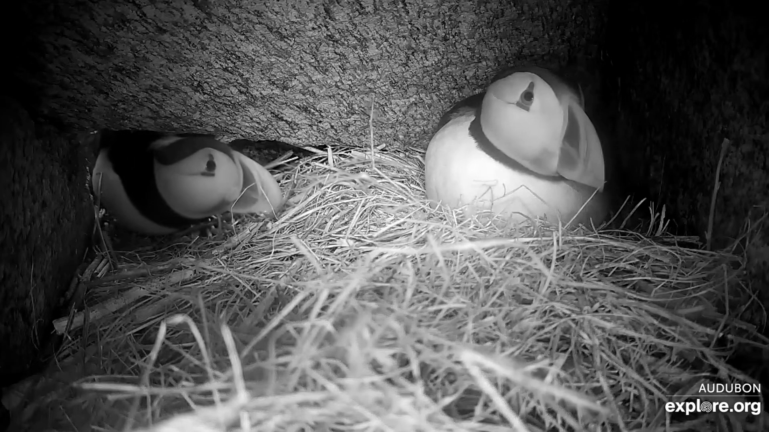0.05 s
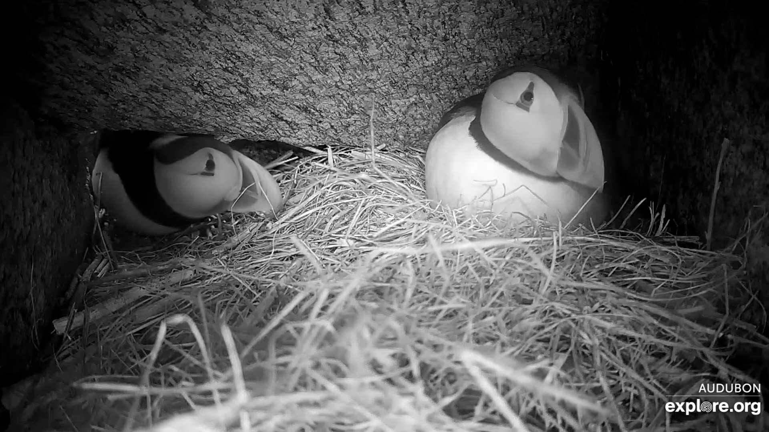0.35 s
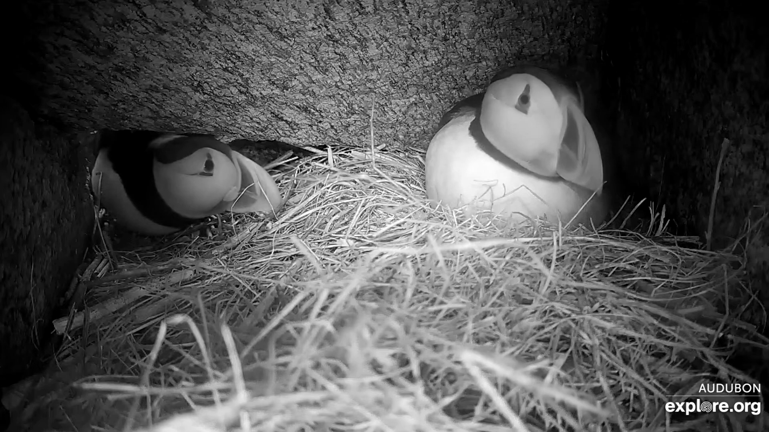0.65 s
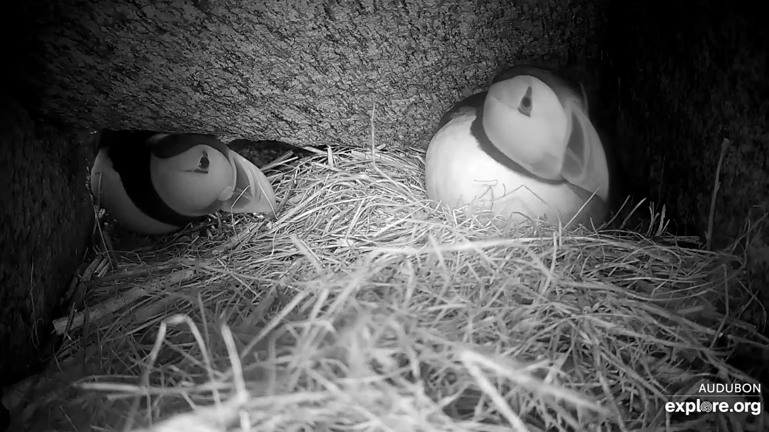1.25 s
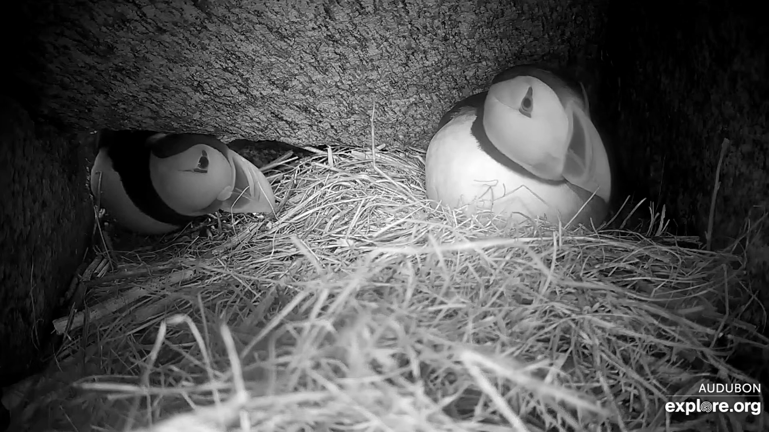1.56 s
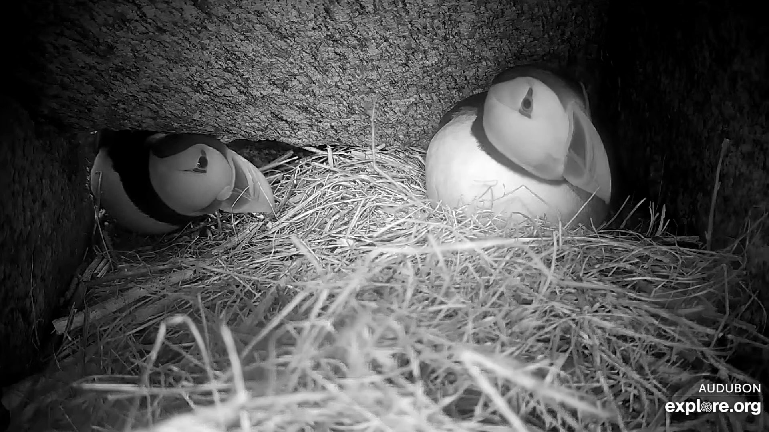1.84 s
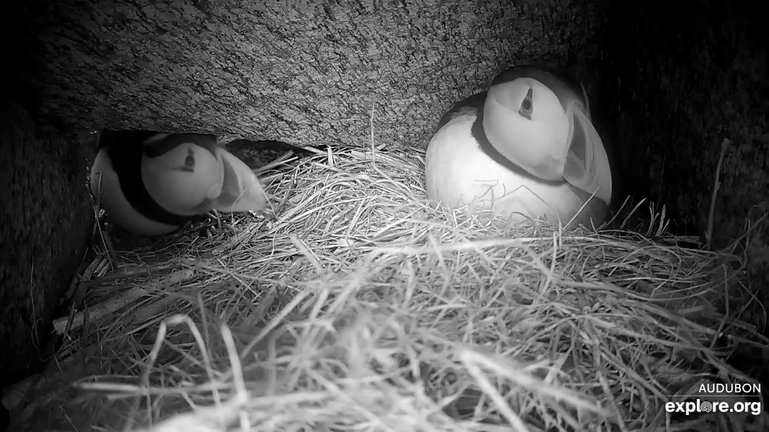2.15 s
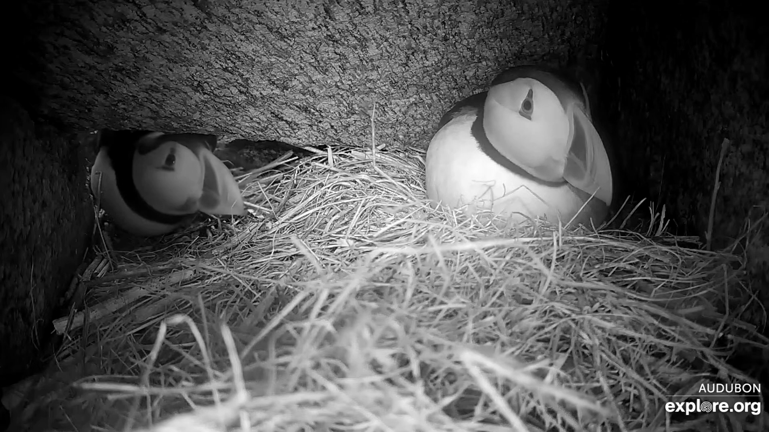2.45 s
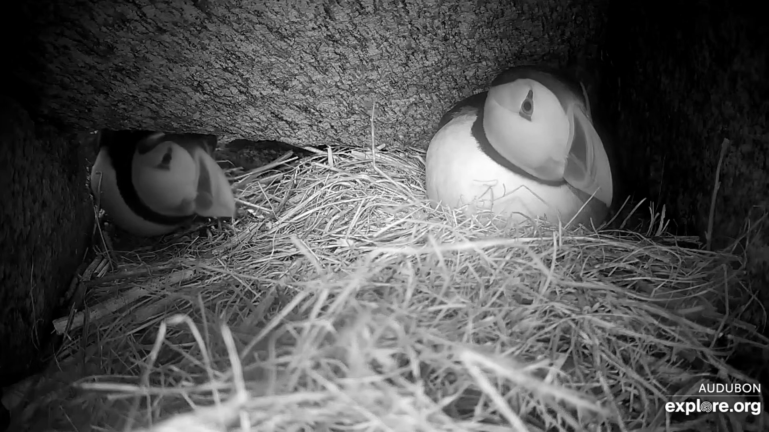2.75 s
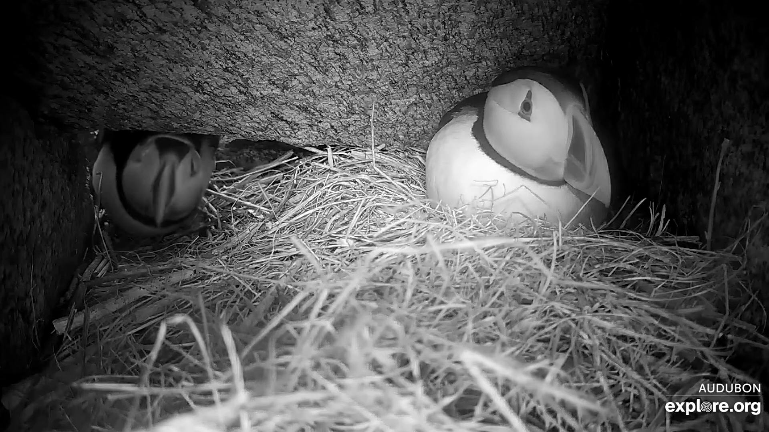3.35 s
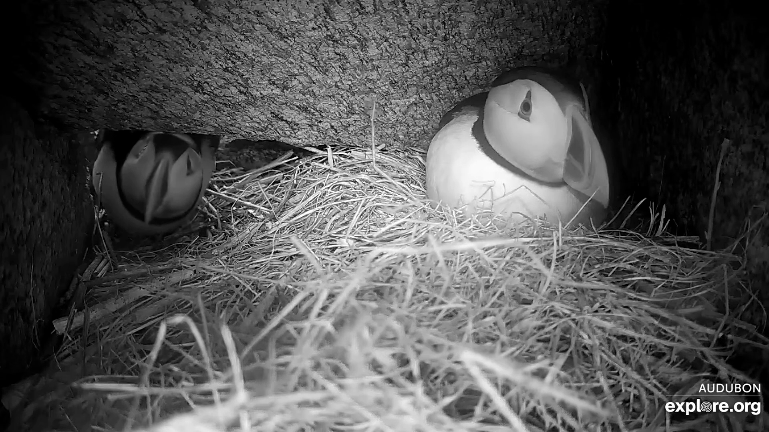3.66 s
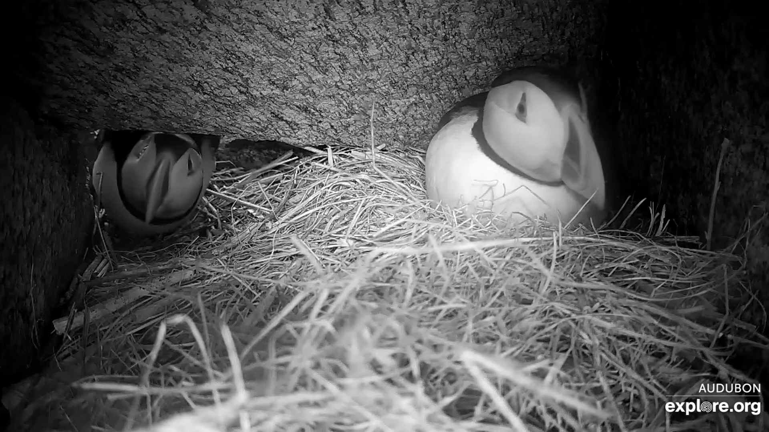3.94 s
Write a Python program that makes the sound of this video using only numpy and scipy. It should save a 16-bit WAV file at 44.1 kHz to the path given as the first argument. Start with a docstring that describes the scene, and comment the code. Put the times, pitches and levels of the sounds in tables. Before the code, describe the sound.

Seabirds call outside a stone nest burrow. One screeches close by at the start, then others overlap in rattling rasps, falling cries and short chips. Heard from inside, with a short ring, over distant colony din and wind rumble.

```python
"""Inside a stone nest burrow, where two puffins sit silent, with a seabird colony (probably terns) outside.
One bird screeches close by at the start; others overlap in rattling rasps, clear falling cries and chips.
Each call is a stack of harmonics on a pitch arc, pulsed for a rattle and shaken for a rough edge.
The burrow colours the birds and adds a short ring; the distant din and a wind rumble lie underneath."""
import sys
import numpy as np
from scipy import signal
from scipy.fft import rfft, irfft, next_fast_len
from scipy.io import wavfile

SR = 44100
rng = np.random.default_rng(int(sys.argv[2]) if len(sys.argv) > 2 else 0)


def transcribe(signal):
    """Save signal, clipped to [-1, 1], as a 16-bit WAV file at the path in sys.argv[1]."""
    frames = np.atleast_2d(signal).T
    limited = np.clip(frames, -1, 1)
    pcm = np.round(limited * 32767).astype(np.int16)
    wavfile.write(sys.argv[1], SR, pcm)


N = 176400

# The close bird's screech, a sagging rattle that breaks into a harsh rasp: t/s, length/s, start f/Hz,
# middle f/Hz, end f/Hz, level/dB, brightness/(dB per octave), top partials/dB, roughness/0-1, rattle/Hz
SCREECH_CALLS = [(-.022, .2, 1464, 1423, 1398, -48, -5.5, 4.4, 0.042, 75.2),
                 (.145, 0.1, 1422, 1385, 1345, -46, -4, 2.4, 0.36, 76.4),
                 (.235, .125, 1510, 1464, 1427, -45, -4.5, 1.2, 0.7, 77.3)]
# Rattling rasps: columns as for the screech
RASP_CALLS = [(0.482, .17, 1552, 1599, 1514, -55, -1, -1, 0.57, 52),
              (0.609, 0.132, 1667, 1763, 1692, -57.5, -6.5, 6, 0.17, 65),
              (.62, .14, 1580, 1484, 1452, -54.5, 2, 2, 0.22, 55),
              (.705, 0.14, 1772, 1650, 1520, -54, -4, 7.5, 0.12, 54),
              (.73, 0.2, 1480, 1393, 1334, -55, 3.5, 1.5, 0.55, 82),
              (.765, 0.21, 1340, 1255, 1198, -58, 4.5, -12, 0.4, 58),
              (0.931, 0.23, 1627, 1600, 1502, -61.5, -1.5, -23, 0.41, 70),
              (1.139, 0.18, 1644, 1576, 1549, -58, -13.5, -8, 0.13, 56),
              (1.331, 0.49, 1549, 1526, 1474, -64.5, -25, -5, 0.51, 63),
              (1.891, 0.28, 1590, 1630, 1550, -65, -1, -7, 0.49, 57),
              (2.111, .17, 1417, 1444, 1523, -54, -1, -2, 0.5, 52),
              (2.199, .11, 1520, 1541, 1485, -55.5, 12.5, -3.5, 0.2, 55),
              (2.4, 0.17, 1530, 1509, 1466, -50.5, 4.5, -6, 0.42, 69),
              (2.559, .18, 1501, 1517, 1438, -52, -2.5, -7, 0.16, 59),
              (2.73, 0.21, 1513, 1492, 1420, -53.5, 4, -1.5, 0.41, 61),
              (3.012, 0.15, 1519, 1500, 1468, -54.5, 8.5, 0, 0.26, 63),
              (3.149, 0.16, 1673, 1643, 1576, -56.5, -10, 5.5, 0.07, 42),
              (3.271, 0.21, 1518, 1485, 1420, -58, 3, 3, 0.47, 64),
              (3.579, 0.22, 1720, 1669, 1591, -55.5, -5, 5, 0.42, 58),
              (3.77, 0.33, 1542, 1464, 1503, -52.5, -1, 3, 0.63, 63)]
# Clear cries: columns as for the screech, without the rattle
CRY_CALLS = [(0.933, 0.125, 1654, 1666, 1635, -69, 15, -18, 0.08),
             (1.365, 0.17, 1846, 1840, 1805, -71.5, 8, -14, .22),
             (1.382, 0.16, 1197, 1104, 1020, -64.5, -15, -7, 0.52),
             (1.536, 0.23, 1225, 1205, 1110, -66.5, -24, 1, 0.39),
             (1.692, 0.14, 1662, 1667, 1610, -70.5, 9, 3, 0.1),
             (1.806, 0.092, 1700, 1698, 1640, -72, 8, 0, 0.17),
             (1.89, 0.2, 1554, 1660, 1692, -56.5, 10, -10.5, 0.4),
             (1.891, 0.39, 1221, 1202, 1206, -64.5, 0.5, 1.5, 0.05),
             (2.253, 0.091, 1790, 1656, 1556, -56.5, -2, -10, 0.01),
             (2.321, 0.14, 1980, 1900, 1880, -68, -18, -10, 0.2),
             (2.354, 0.12, 1230, 1155, 1000, -66, -17, -5, 0.3),
             (2.555, 0.14, 1723, 1764, 1740, -63, 4, 1, 0.26),
             (2.555, 0.19, 1260, 1330, 1270, -61.5, 8, -9, 0.2),
             (2.712, 0.16, 1290, 1135, 1007, -58, -3.5, 4, 0.45),
             (2.936, 0.13, 1874, 1830, 1835, -63, -13, -10, 0.23),
             (2.992, 0.068, 1422, 1424, 1382, -49, -8.5, 0.5, 0),
             (3.057, 0.088, 1370, 1310, 1250, -56.5, 11, -2.5, 0.42),
             (3.157, 0.25, 1390, 1408, 1370, -61.5, -2, 12, 0),
             (3.376, 0.12, 1913, 1740, 1534, -62.5, -22, 15, 0.07),
             (3.489, 0.14, 1727, 1775, 1732, -57, 8.5, -3, 0.44),
             (3.788, 0.071, 1578, 1417, 1245, -52.5, -7, 8, 0.05),
             (3.965, 0.069, 1630, 1686, 1710, -54.5, 9, -8, 0.34)]
# Short chips: t/s, level/dB
CHIP_CUES = [(0.501, -66), (1.013, -55.5), (1.084, -62), (1.128, -61.5), (1.714, -58), (2.599, -56),
             (2.864, -55), (2.895, -58.5), (3.16, -58), (3.456, -57.5)]
# The voice's base timbre, from the fundamental up: level/dB
PARTIALS_DB = [-4.5, 2, 1.5, 2, -4, -2, -2, -6.5, -2]
# Tone of the close bird: f/Hz, gain/dB
CLOSE_EQ = [(400, -2), (700, 5.5), (860, 3), (1050, 14), (1380, -6), (1620, -16), (1900, 6.5), (2280, 9.5),
            (2820, 0), (3250, 6.5), (3560, 3), (3920, -0.5), (4400, -5.5), (5100, -18), (5900, -2),
            (6700, -13), (7300, -15), (8800, -13), (10200, -19), (10900, -47), (11800, -16), (13000, -46),
            (16000, -52)]
# Tone of the way into the burrow: f/Hz, gain/dB
BURROW_EQ = [(400, -35), (800, -13), (1100, -6), (1380, -2), (1620, -15.5), (1930, -19), (2150, -3.5),
             (2400, -3), (2850, 6), (3200, 1), (3600, -10.5), (4150, 1), (4700, -14), (5400, -14.5),
             (6000, -4), (6800, -10.5), (7550, -30.5), (8300, -12), (9300, -23.5), (10100, -13),
             (10900, -47), (11800, -18), (13000, -53), (16000, -43)]
# Narrow resonances of the chamber: f/Hz, width/Hz, gain/dB
CHAMBER_MODES = [(980, 11, 6), (2367, 73, -8), (3140, 26, -24), (3820, 24, 8.5), (4930, 40, 7.5),
                 (6300, 7.9, -24)]
# Fader ride on the distant din: t/s, gain/dB
COLONY_RIDE = [(0, 10.5), (.36, 5), (.42, 1), (.8, 5), (1.35, -2), (1.84, -2.5), (2.0, 3.5), (2.36, 1),
               (2.65, 2.5), (2.97, -1), (3.3, 4), (4, 6)]
# Tone of the wind's rumble: f/Hz, gain/dB
RUMBLE_EQ = [(20, -4), (40, -11), (69, 1.5), (82, -11), (104, 5), (135, 0), (177, -3), (211, -10),
             (310, -12.5), (400, -21), (576, -24.5), (760, -36.5), (1200, -25.5), (1900, -57),
             (5000, -72.5), (15500, -54.5)]
# Gusts in the rumble: t/s, level/dB
GUST_RIDE = [(0, -54.5), (.3, -52.5), (.9, -52.5), (1.7, -53), (2.0, -48.5), (2.18, -54), (2.29, -48.5),
             (2.4, -51.5), (3.0, -51), (3.25, -50.5), (4, -50)]
# Tone of the wind's low-mid rush: f/Hz, gain/dB
RUSH_EQ = [(80, -23), (170, -4), (240, -4), (310, -3.5), (400, -9.5), (600, -12.5), (900, -31), (3000, -45),
           (12000, -80)]
# Swells of that rush: t/s, level/dB
RUSH_RIDE = [(0, -66), (1.2, -65), (2.1, -70), (2.3, -77), (2.45, -64.5), (3.5, -73.5), (3.9, -59),
             (4, -63)]
# Faint steady tones in the wind: f/Hz, level/dB
HUM_TONES = [(100, -62), (355, -76), (473, -78), (964, -89.5)]

CHIP_S, CHIP_ARC_HZ, CHIP_BRIGHT_DB, CHIP_TOP_DB, CHIP_ROUGH = 0.0342, (1682, 1565, 1303), 4.5, -6, 0.26
ATTACK_S, RELEASE_S = 0.016, 0.016
RATTLE_DB, RATTLE_BEND, RATTLE_DRIFT = 9.5, .024, .06   # level swing; fractions of pitch and pulse rate
WAVER, WAVER_HZ, FLICKER_DB, FLICKER_HZ = 0.00987, 130.06, 4.5, 54.85   # pitch wavers, partials flicker
JITTER, JITTER_HZ, GRIT_DB, GRIT_HZ = 0.0587, 897.4, 10, 1300   # pitch and level shake at full roughness
SMEAR_T60_S, SMEAR_DB, ECHO_T60_S, ECHO_DB, CLOSE_ECHO_DB = 0.02, -5, 0.28, -9.5, -15
FAR_CALLS_PER_S, FAR_DB, WASH_DB = 12, -60, -65.5   # levels ahead of the colony's fader ride
CUTOFF_HZ = 15700


def bird_call(eq, length, start_hz, mid_hz, end_hz, db, bright_db, top_db, rough, rattle_hz=0):
    """A harmonic voice on a pitch arc, pulsed if it rattles; roughness shakes it and blurs the pulses."""
    size = int(length * SR)
    t, progress = np.arange(size) / SR, np.linspace(0, 1, size)
    bow_hz = 2 * (2 * mid_hz - start_hz - end_hz) * progress * (1 - progress)
    hz = start_hz + (end_hz - start_hz) * progress + bow_hz
    hz *= 1 + JITTER * rough * wobble(JITTER_HZ, size) + WAVER * wobble(WAVER_HZ, size)
    rattle_phase = 2 * np.pi * np.cumsum(rattle_hz * (1 + RATTLE_DRIFT * wobble(38.4, size))) / SR
    phase = np.float32(2 * np.pi * np.cumsum(hz * (1 - RATTLE_BEND * np.sin(rattle_phase))) / SR)
    pulses = rms_one(from_db(RATTLE_DB * (1 - rough) * np.cos(rattle_phase)))
    voice = 0.93 * rough * rng.standard_normal(SR // 2)[:size]   # hiss under the partials
    for k, partial_db in enumerate(PARTIALS_DB, 1):
        level_db = partial_db + bright_db * np.log2(np.clip(k, 2, 4) / 2) + top_db * (k > 4)
        flicker = from_db(level_db + FLICKER_DB * np.tanh(rng.standard_normal(64)))
        voice += np.interp(t * FLICKER_HZ, np.arange(len(flicker)), flicker) * np.sin(k * phase)
    grit = from_db(GRIT_DB * rough * np.tanh(wobble(GRIT_HZ, size)))
    envelope = np.clip(t / ATTACK_S, 0, 1) * np.clip((t[-1] - t) / RELEASE_S, 0, 1)
    return from_db(db) * rms_one(entrance(colour(voice * pulses * grit, eq) * envelope))


def call_track(cues, eq):
    """Lay a cue list of bird calls on one track."""
    track = np.zeros(N)
    for start_s, *shape in cues:
        add(track, start_s, bird_call(eq, *shape))
    return track


def near_birds():
    """The foreground: the screech, rasps, cries and chips, echoing among the rocks."""
    chips = [(s, CHIP_S, *CHIP_ARC_HZ, db, CHIP_BRIGHT_DB, CHIP_TOP_DB, CHIP_ROUGH)
             for s, db in CHIP_CUES]
    neighbours = call_track(RASP_CALLS + CRY_CALLS + chips, BURROW_EQ)
    screech = call_track(SCREECH_CALLS, CLOSE_EQ)
    echo_send = from_db(ECHO_DB) * neighbours + from_db(CLOSE_ECHO_DB) * screech
    return neighbours + screech + reflections(echo_send, ECHO_T60_S)


def entrance(x):
    """Each call takes its own way in between the stones, with its own quick smear of reflections."""
    wet = from_db(SMEAR_DB)
    return (x + wet * reflections(x, SMEAR_T60_S)) / np.hypot(1, wet)


def reflections(x, t60):
    """Dense reflections off stone: a dying noise tail after 1 ms of pre-delay."""
    t = np.arange(SR // 2) / SR
    tail = rng.standard_normal(len(t)) * from_db(-60 * t / t60) * (t > .001)
    return signal.fftconvolve(x, tail / np.linalg.norm(tail))[:len(x)]


def burrow(x):
    """The small stone chamber rings at a few narrow resonances."""
    return x + sum(from_db(db) * signal.lfilter(*signal.iirpeak(hz, hz / width, fs=SR), x)
                   for hz, width, db in CHAMBER_MODES)


def far_birds():
    """The colony bed: random falling calls, every other one rattling, and a wash where the farthest merge."""
    hiss = colour(rng.standard_normal(N), BURROW_EQ)
    wash = from_db(WASH_DB) * rms_one(colour(hiss, [(1000, 2.5), (3000, 1), (7000, -2.5), (12000, -23)]))
    chatter = np.zeros(N)
    for k in range(int(FAR_CALLS_PER_S * N / SR)):
        when, span, pitch, rough = rng.random(4)
        hz = 1200 + 550 * pitch
        call = bird_call(BURROW_EQ, .12 + 0.22 * span, hz, hz, .92 * hz, db=0, bright_db=-4.5,
                         top_db=-6, rough=0.21 + 0.33 * rough, rattle_hz=62 * (k % 2))
        add(chatter, (k + when) / FAR_CALLS_PER_S - .1, call)
    return level_curve(COLONY_RIDE) * (from_db(FAR_DB) * rms_one(chatter) + wash)


def wind():
    """The low bed: a rumble that swells with the gusts, a faint hum and a little low-mid rush."""
    t = np.arange(N) / SR
    hum = sum(from_db(db) * np.sqrt(2) * np.sin(2 * np.pi * hz * t + 0.96 * wobble(9, N))
              for hz, db in HUM_TONES)
    rumble = level_curve(GUST_RIDE) * rms_one(colour(rng.standard_normal(N), RUMBLE_EQ))
    rush = level_curve(RUSH_RIDE) * rms_one(colour(rng.standard_normal(N), RUSH_EQ))
    return rumble + hum + rush


def from_db(db):
    """Decibels to gain."""
    return np.exp(np.asarray(db) * (np.log(10) / 20))


def rms_one(x):
    """Scale to unit power."""
    return x / np.sqrt(np.mean(x ** 2) + 1e-20)


def level_curve(ride):
    """A fader ride through points of t/s, level/dB."""
    return from_db(np.interp(np.arange(N) / SR, *np.transpose(ride)))


def colour(x, eq):
    """Equalise a sound through points of f/Hz, gain/dB."""
    hz, db = np.transpose(eq)
    size = next_fast_len(len(x) + 1024, True)
    bin_hz = np.maximum(np.arange(size // 2 + 1) * SR / size, 1)
    gain = from_db(np.interp(np.log(bin_hz), np.log(hz), db))
    return irfft(rfft(x, size) * gain, size)[:len(x)]


def wobble(hz, size):
    """A random modulator that glides to a new value hz times a second."""
    knots = rng.standard_normal(2048)
    return np.interp(np.arange(size) * hz / SR, np.arange(len(knots)), knots)


def add(track, start_s, sound):
    """Drop a sound onto a track, trimming any overhang."""
    start = int(start_s * SR)
    first, last = max(start, 0), min(start + len(sound), N)
    if last > first:
        track[first:last] += sound[first - start:last - start]


def scene():
    """The mono mix: the birds ring in the burrow, over the wind."""
    return (wind() + from_db(-1.0) * burrow(near_birds() + far_birds()))[None]


def record(dry):
    """A steep low-pass takes the very top off the mix."""
    return signal.sosfilt(signal.ellip(10, .1, 70, CUTOFF_HZ, fs=SR, output="sos"), dry)


dry = scene()
out = record(dry)
transcribe(out)
```